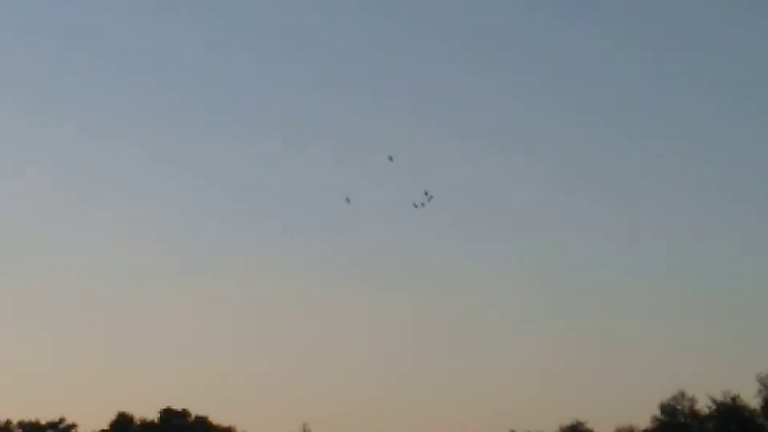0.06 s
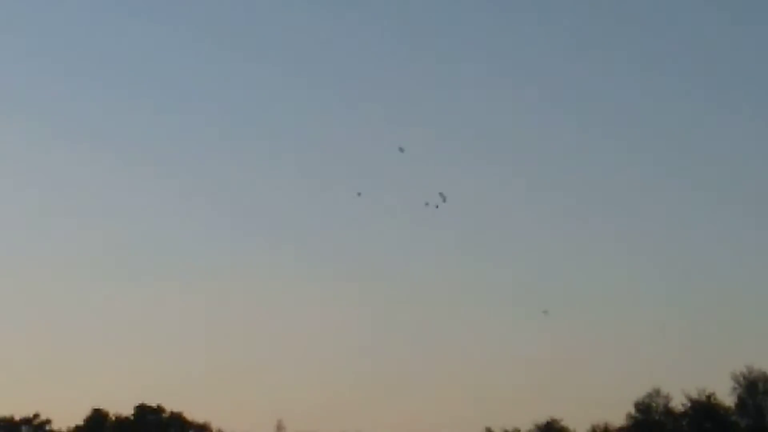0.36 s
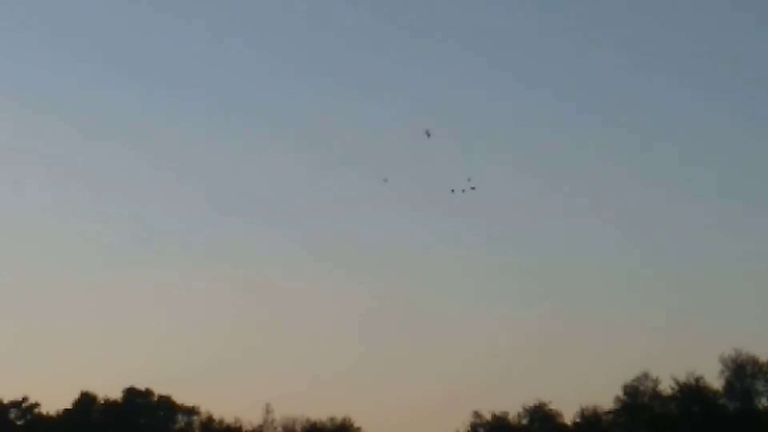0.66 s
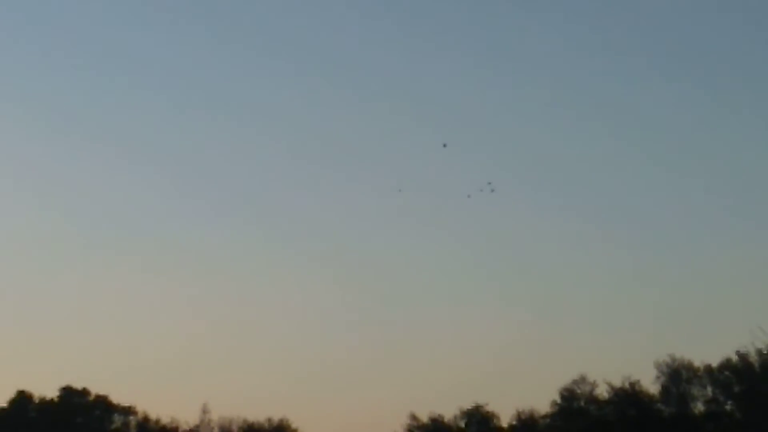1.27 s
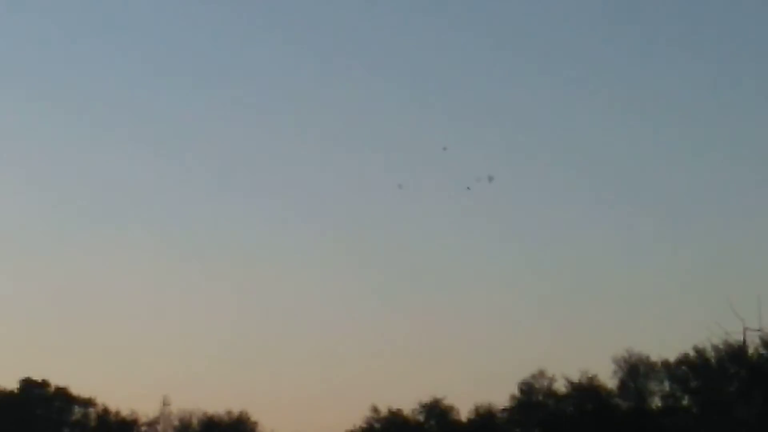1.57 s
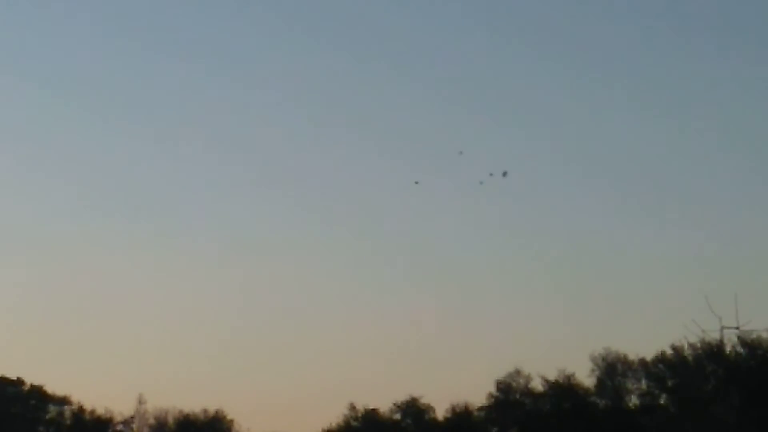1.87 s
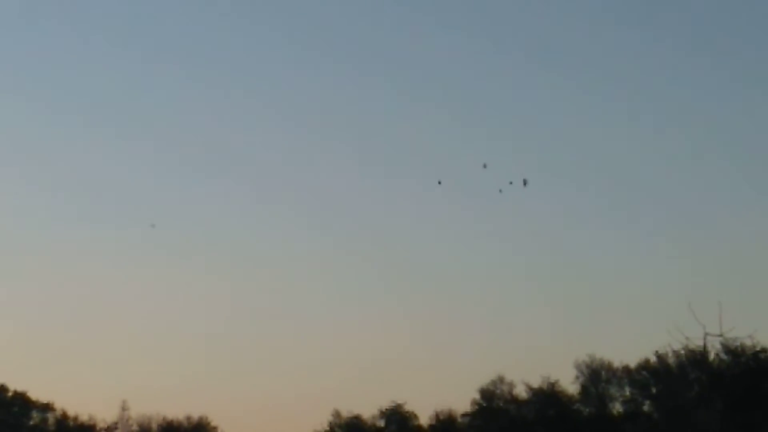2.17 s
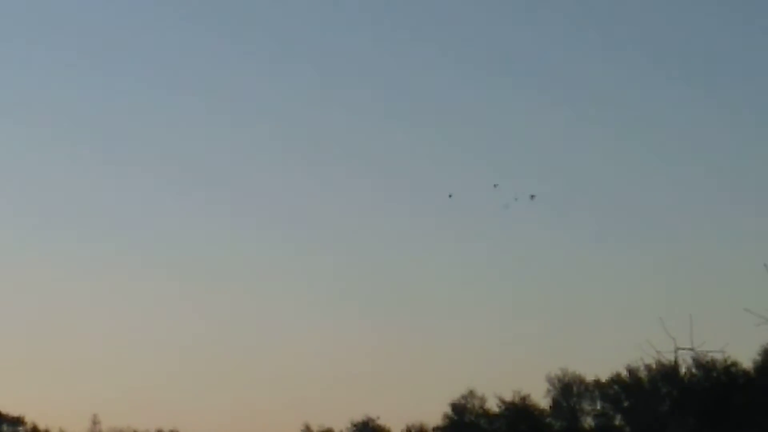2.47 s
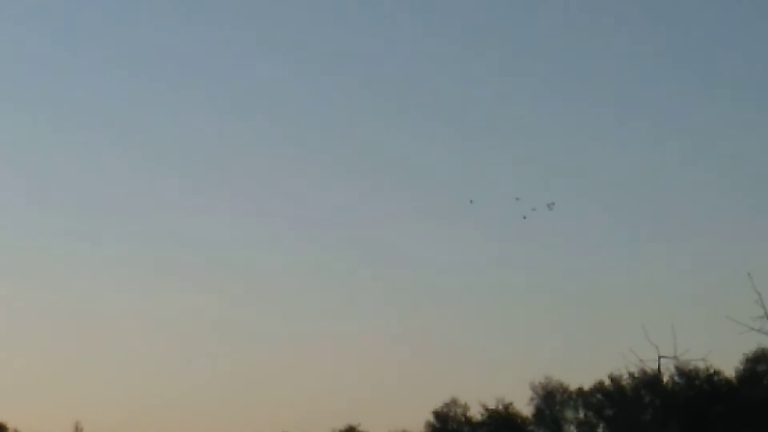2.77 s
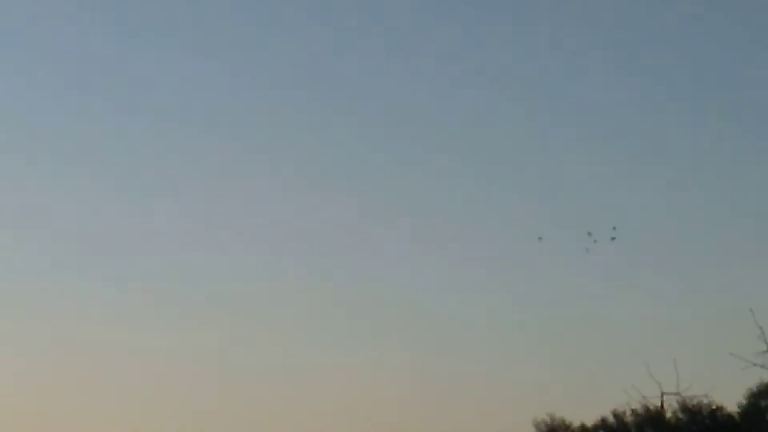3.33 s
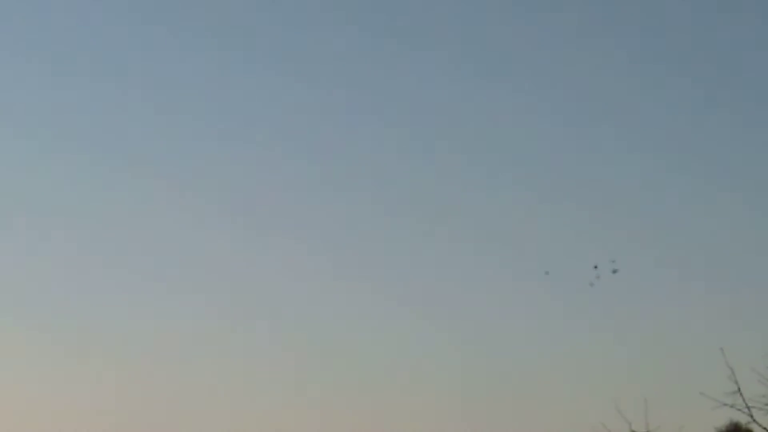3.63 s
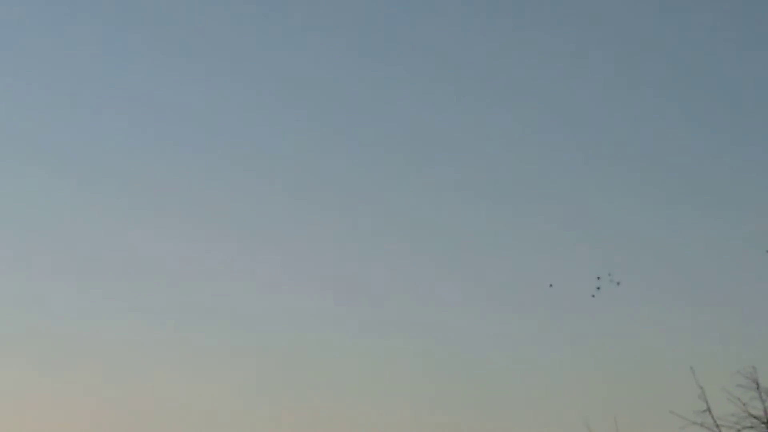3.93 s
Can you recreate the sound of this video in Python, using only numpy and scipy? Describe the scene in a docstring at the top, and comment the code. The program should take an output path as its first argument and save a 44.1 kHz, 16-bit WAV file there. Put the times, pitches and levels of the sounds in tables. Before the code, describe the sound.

Long falling bird calls repeat outdoors, mixed with short chirps and faint microphone bumps.

```python
"""Birds at dusk over a tree line.

A bird of prey gives five long falling mews, each breaking to a lower note at its end. A second bird
cuts in with short arched chirps; others add thin slurs, a rasp and far caws. The pitched calls are
gliding stacks of partials that the trees scatter back. Handling bumps ring the camera's case on the
right of the microphone, over faint rumble and still air."""
import sys
import numpy as np
from scipy import signal
from scipy.fft import rfft, irfft
from scipy.io import wavfile

SR = 44100
rng = np.random.default_rng(int(sys.argv[2]) if len(sys.argv) > 2 else 0)


def generate_wav(sig):
    """Save sig (samples, or channels by samples) to the path in sys.argv[1] as 16-bit PCM at SR."""
    pcm = np.round(np.clip(np.atleast_2d(sig).T, -1, 1) * 32767).astype(np.int16)
    wavfile.write(sys.argv[1], SR, pcm)


N = 176400
TIME = np.arange(N) / SR
TREE_LINE_T60_S = 0.56


def from_db(db):
    """Decibels to gain."""
    return 10 ** (np.asarray(db) / 20)


def along(rows, x, column=1):
    """Read a breakpoint curve by straight lines."""
    rows = np.array(rows)
    return np.interp(x, rows[:, 0], rows[:, column])


def at_hz(points, hz):
    """Read an EQ curve in dB on a log-frequency axis."""
    f, db = np.transpose(points)
    return np.interp(np.log(np.maximum(hz, 1)), np.log(f), db)


def sides(pan_db):
    """Equal-power pan gains; pan_db is left minus right."""
    ratio = from_db(np.atleast_1d(pan_db))
    return np.array([ratio, np.ones_like(ratio)]) * np.sqrt(2 / (1 + ratio ** 2))


def coloured(x, points):
    """Shape a sound with an EQ curve."""
    hz = np.fft.rfftfreq(x.shape[-1], 1 / SR)
    return irfft(rfft(x) * from_db(at_hz(points, hz)), x.shape[-1])


def noise(points):
    """Coloured noise of unit power, unrelated in the two channels."""
    x = coloured(rng.standard_normal((2, N)), points)
    return x / np.sqrt(np.mean(x ** 2))


def wander(t, rate):
    """Random drift with a spread near 1 and `rate` turning points a second."""
    return np.interp(t * rate, np.arange(4096), rng.standard_normal(4096))


def gate(t, length, attack_s, release_s):
    """Envelope: rounded rise, hold, straight fall."""
    return np.sin(np.pi / 2 * np.clip(t / attack_s, 0, 1)) * np.clip((length - t) / release_s, 0, 1)


def swells(rows):
    """Envelope of bell-shaped rises and falls."""
    return sum(from_db(db) * np.exp(-((TIME - s) / width) ** 2) for s, width, db in rows)


def phase_of(hz, t, jitter, rate=500):
    """Running phase of a slightly unsteady voice; jitter is a share of the pitch."""
    return 2 * np.pi * np.cumsum(hz * (1 + jitter * wander(t, rate))) / SR


def partials(phase, levels_db):
    """Harmonic stack of one voice."""
    return sum(from_db(db) * np.sin(k * phase) for k, db in enumerate(levels_db, 1))


def add(out, start, x):
    """Mix a sound in at its start time."""
    i = int(start * SR)
    out[i:i + len(x)] += x[:max(N - i, 0)]


def scatter(x, t60_s, build_s=0.0091):
    """Diffuse dying echoes, different on each side."""
    # darkened tone of the echoes: (frequency [Hz], level [dB])
    echo_eq = [(1000, 1), (3200, -1.5), (5000, -4.5), (6700, -7), (8200, -7), (10000, -7.5), (14000, -13.5)]
    t = TIME[:SR]
    wash = coloured(rng.standard_normal((2, SR)), echo_eq)
    envelope = from_db(-60 * t / t60_s) * (1 - np.exp(-t / build_s))
    tail = wash * envelope / np.sqrt(np.sum(envelope ** 2))
    return signal.fftconvolve(x[None], tail, axes=1)[:, :N]


def placed(x, pan, left_lag_ms):
    """A bird at the two microphone ports: panned by frequency, slightly later on the left."""
    hz = np.fft.rfftfreq(N, 1 / SR)
    lag = np.exp(-2j * np.pi * hz * left_lag_ms / 1000 * np.array([[1], [0]]))
    return irfft(rfft(x) * sides(at_hz(pan, hz)) * lag, N)


def background():
    """Still evening air, and a low rumble mostly out of phase between the channels."""
    # tone of the air and of the rumble: (frequency [Hz], level [dB])
    air_eq = [(100, -2), (300, -6.5), (900, 0.5), (1700, -3.5), (2600, 11), (4000, -10.5), (8000, -16),
              (12500, -12), (15500, -21.5)]
    rumble_eq = [(20, -13.5), (55, 10.5), (100, 9), (180, 1), (350, -11.5), (1000, -34)]
    opposed, common = noise(rumble_eq)
    rumble = opposed * np.array([[1], [-1]]) + from_db(-11.5) * common
    return from_db(-72) * noise(air_eq) + from_db(-67) * rumble


def hisses():
    """Soft swells of very high hiss on the left."""
    # swells of hiss: (time [s], width [s], level [dB])
    cues = [(.04, 0.024, -56.5), (.503, 0.011, -63), (.555, 0.017, -67), (2.395, 0.0069, -66),
            (2.76, 0.041, -71), (2.96, 0.035, -65.5), (3.02, 0.045, -72.5)]
    # airy top band: (frequency [Hz], level [dB])
    hiss_eq = [(6000, -46), (10500, 29.5), (13000, 29), (15500, -50)]
    return noise(hiss_eq) * swells(cues) * sides(pan_db=25)


def thumps():
    """Dull stirrings of the hand on the camera."""
    # shifts of the grip: (time [s], width [s], level [dB])
    cues = [(.235, 0.013, -67.5), (1.09, 0.022, -57.5), (1.87, .035, -62), (3.6, 0.075, -67),
            (3.79, 0.022, -61.5), (3.97, 0.021, -59.5)]
    # bass-heavy tone: (frequency [Hz], level [dB])
    thump_eq = [(40, -8), (80, -3), (165, 1), (230, -14.5), (500, -36), (2000, -97)]
    return noise(thump_eq) * swells(cues)


def rustles():
    """Faint rubbing of the hand on the case, mostly on the right."""
    # slides of the hand: (time [s], width [s], level [dB])
    cues = [(.03, 0.017, -50.5), (2.97, .04, -65), (3.25, 0.034, -59), (3.34, 0.051, -58.5),
            (3.47, 0.051, -67), (3.62, 0.056, -63.5), (3.79, 0.079, -71), (3.99, 0.032, -59)]
    # tone of the rubbing: (frequency [Hz], level [dB])
    rustle_eq = [(120, -20.5), (270, 8.5), (600, -8.5), (1000, -2), (1600, 2.5), (2500, -12), (5000, -28),
                 (10000, -45)]
    return noise(rustle_eq) * swells(cues) * sides(pan_db=-6.5)


def bumps():
    """Short knocks ring the damped modes of the camera's case, on the right, each with a faint tail."""
    # knocks: (time [s], strike level [dB], contact low-pass [Hz], extra drive of the lowest mode [dB])
    hits = [(.0160, -2.5, 833, 6.5), (0.018, -22, 910, -2), (0.0255, -30, 1490, -4),
            (0.0325, -26, 694, 13.5), (.0929, -10.5, 3240, -2), (0.8806, -10.5, 3350, -6),
            (1.61, -17.5, 3570, 4), (1.708, -12, 3250, -20), (1.8033, -18.5, 2380, 4),
            (2.3482, -13.5, 3670, -12.5), (2.8292, -13.5, 3570, 4), (2.9359, -13, 3330, 0),
            (2.949, -26.5, 5730, 14.5), (3.2142, -16.5, 3730, 11), (3.2258, -31.5, 2100, 24),
            (3.29, -16, 2220, 11.5), (3.5623, -15, 3440, 7.5)]
    # resonances of the case, lowest first: (frequency [Hz], bandwidth [Hz], gain [dB])
    case_modes = [(282, 199, -26), (550, 190, -22.5), (764, 119, -27.5), (1574, 830, -9.5),
                  (2414, 570, -19), (5040, 4000, 3.5)]
    knocks, thuds, case = np.zeros((3, N))
    for start, db, contact_hz, thud_db in hits:
        softness = signal.butter(2, contact_hz, fs=SR)
        contact = from_db(db) * signal.lfilter(*softness, signal.unit_impulse(512))
        add(knocks, start, contact)
        add(thuds, start, contact * from_db(thud_db))
    for k, (hz, width_hz, db) in enumerate(case_modes):
        radius, angle = np.exp(-np.pi * width_hz / SR), 2 * np.pi * hz / SR
        poles = [1, -2 * radius * np.cos(angle), radius ** 2]
        drive = (knocks if k else thuds) + 1e-18 * rng.standard_normal(N)  # guards against underflow
        case += from_db(db) * signal.lfilter([.5, 0, -.5], poles, drive)
    case = signal.sosfilt(signal.butter(2, [236, 4950], "band", fs=SR, output="sos"), case)
    # EQ on the send to the tail: (frequency [Hz], level [dB])
    tail_eq = [(150, -4), (300, 1), (700, -5), (1000, 3.5), (2000, -1), (4000, 0), (8000, 3)]
    tail = from_db(-7.5) * scatter(coloured(case, tail_eq), t60_s=0.36)
    return case * sides(pan_db=-29) + tail * sides(pan_db=-17)


def caws():
    """Far low calls, hoarse with pitch jitter, sagging a little and echoing off the trees."""
    # caws: (start [s], length [s], pitch [Hz], level [dB])
    calls = [(2.644, 0.098, 472.6, -62), (3.639, 0.1004, 479, -51.5), (3.953, 0.12, 451.3, -57)]
    # harmonics from a weak fundamental up: (level [dB])
    harmonics_db = [-33, -7.5, -4, -6.5, -24]
    out = np.zeros(N)
    for start, length, hz, db in calls:
        t = TIME[:int(length * SR)]
        sag = 1 - 0.0638 * t / length
        voice = partials(phase_of(hz * sag, t, jitter=0.077, rate=590), harmonics_db)
        add(out, start, from_db(db) * voice * gate(t, length, 0.025, 0.035))
    return out + from_db(-3.5) * scatter(out, TREE_LINE_T60_S)


def rasp():
    """One harsh, toneless note: a burst of bright noise."""
    # sharp attack and stepped decay: (time [s], level [dB])
    envelope = [(3.742, -73), (3.749, -41), (3.762, -42.5), (3.773, -52.5), (3.82, -56), (3.84, -65.5),
                (3.9, -78)]
    # tone of the rasp: (frequency [Hz], level [dB])
    rasp_eq = [(2500, -29), (3700, -5), (5300, 4.5), (6200, -7), (7300, -22.5), (11000, -19), (13500, -25),
               (15000, -51)]
    sounding = (TIME > envelope[0][0]) & (TIME < envelope[-1][0])
    return noise(rasp_eq) * from_db(along(envelope, TIME)) * sounding


def slurs():
    """Quick thin downward whistles of a smaller bird."""
    # slurs: (start [s], length [s], first pitch [Hz], last pitch [Hz], level [dB])
    calls = [(0.441, 0.045, 4600, 4130, -63), (0.482, 0.055, 4380, 3363, -43.5),
             (.528, 0.027, 3390, 1985, -51), (3.516, 0.058, 4150, 3800, -60),
             (3.89, 0.047, 4550, 3760, -65)]
    # harmonics from a strong fundamental up: (level [dB])
    harmonics_db = [3.5, -17.5, -24]
    out = np.zeros(N)
    for start, length, first_hz, last_hz, db in calls:
        t = TIME[:int(length * SR)]
        phase = phase_of(first_hz + (last_hz - first_hz) * t / length, t, jitter=0.014)
        add(out, start, from_db(db) * partials(phase, harmonics_db) * gate(t, length, 0.014, 0.012))
    return out


def chirps():
    """Each chirp leaps an octave, sags and drops back; its harmonics sweep the throat's resonances."""
    # chirps: (start [s], top pitch [Hz], level [dB], high shelf [dB], warble depth [share of pitch])
    calls = [(0.71, 3550, -38.5, -11, 0.0036), (1.002, 3558, -36, 1, 0.0041), (1.207, 3500, -37, 6, 0.044),
             (1.416, 3530, -41.5, 4.5, 0.038), (1.606, 3528, -39, 1.5, 0.015),
             (1.777, 3484, -36, -6.5, 0.024), (1.981, 3435, -36.5, -3.5, 0.0054),
             (2.237, 3426, -39.5, -2.5, 0.0042)]
    # arch of one chirp: (time [s], pitch [share of top pitch], level [dB])
    arch = [(0, .52, -25), (.012, .68, -6), (.018, .98, -5), (.022, 1.0, -3), (.042, .935, 0),
            (.058, .865, -1), (.063, .6, -8), (.080, .5, -18)]
    # resonances of the throat: (frequency [Hz], level [dB])
    throat = [(1700, 3), (2300, -6.5), (3200, -8), (4800, 3.5), (5600, -14.5), (6800, -3.5), (7600, -17.5),
              (8300, -29.5), (10000, -11), (11500, -13), (13000, -26), (14500, -43)]
    warble_hz, shelf_hz = 256.3, 10200
    length = arch[-1][0]
    t = TIME[:int(length * SR)]
    envelope = from_db(along(arch, t, column=2)) * gate(t, length, 0.0026, 0.0016)
    out = np.zeros(N)
    for start, top_hz, db, shelf_db, warble_depth in calls:
        hz = top_hz * along(arch, t)
        warble = 1 + warble_depth * np.sin(2 * np.pi * warble_hz * t)
        phase = phase_of(hz * warble, t, jitter=0.011, rate=900)
        harmonics_db = [at_hz(throat, k * hz) + shelf_db * (k * hz > shelf_hz) for k in range(1, 5)]
        add(out, start, from_db(db) * partials(phase, harmonics_db) * envelope)
    return out


def small_birds():
    """Chirps and slurs, smeared by close foliage and echoed by the trees; the rasp stays dry."""
    # the treble leans left: (frequency [Hz], left minus right [dB])
    pan = [(1800, -6.5), (3300, -1), (5000, 3), (6700, -1.5), (8000, 9), (10000, 19), (13500, 25)]
    calls = chirps() + slurs()
    leaves = from_db(-0.5) * scatter(calls, t60_s=0.088, build_s=0.006)
    trees = from_db(-3.5) * scatter(calls, t60_s=0.54)
    return placed(from_db(-2.5) * calls + leaves + trees + rasp(), pan, left_lag_ms=0.028)


def mew_voice(t, length, first_hz, last_hz, overtones_db, highest_db):
    """A hoarse-edged whistle that scoops up, overshoots, sinks and dips just before the voice breaks."""
    # partials, the half multiples coming from uneven cycles: (frequency [multiple of pitch])
    multiples = [.5, 1, 1.5, 2, 2.5, 3, 3.5, 4]
    # balance of those partials: (level [dB])
    levels_db = [-26.5, -0.5, -18, -14.5, -23.5, -24, -36.5, -32.5]
    # quarter multiples that roughen the onset: (frequency [multiple of pitch])
    onset_multiples = [.75, 1.25, 1.75, 2.25, 2.75]
    progress = t / length
    glide_hz = first_hz + (last_hz - first_hz) * progress
    scoop_hz = 641.6 * np.exp(-t / 0.01)
    overshoot_hz = 348.8 * np.exp(-t / 0.037)
    dip_hz = 170 * np.exp((t - length) / 0.0085)
    waver = 1 + 0.0028 * wander(t, rate=36.17)
    phase = phase_of((glide_hz + overshoot_hz - scoop_hz) * waver - dip_hz, t, jitter=0.0026)
    voice = 0
    for k, db in zip(multiples, levels_db):
        # each overtone fades in and out while the whole call slowly dulls
        brightness_db = overtones_db + 3 * (1 - progress) + 4.5 * wander(t, rate=11.55)
        flutter_db = 1.8 * (.5 + progress) * wander(t, rate=93)
        partial_db = db + (k > 1) * brightness_db + (k >= 3) * highest_db + flutter_db
        voice += from_db(partial_db) * np.sin(k * phase)
    hoarseness = sum(np.sin(k * phase) / k ** 2 for k in onset_multiples)
    return voice + from_db(-12.5) * np.exp(-(t / 0.04) ** 2) * hoarseness


def closing_note(hz):
    """The lower, reedier note that a mew breaks to, drooping as it fades."""
    # pitch droop: (time [s], pitch [share of first pitch])
    droop = [(0, 1.0), (.06, .97), (.105, .93), (.145, .8)]
    # harmonics from the fundamental up, strongest at the second and third: (level [dB])
    harmonics_db = [-28.5, -0.5, 0, -15, -26, -28]
    length_s, fade_db = 0.15, -4.5
    t = TIME[:int(length_s * SR)]
    voice = partials(phase_of(hz * along(droop, t), t, jitter=0.005), harmonics_db)
    return voice * from_db(fade_db * t / length_s) * gate(t, length_s, 0.003, 0.06)


def bird_of_prey():
    """Five long mews, each with its closing note, scattered back by the trees."""
    # mews: (start [s], length [s], glide start [Hz], glide end [Hz], attack [s], first level [dB],
    # middle level [dB], last level [dB], overtone trim [dB], extra trim of the highest overtones [dB],
    # closing pitch [Hz], closing level [dB])
    calls = [(0.016, .402, 2872, 2487, 0.094, -40.5, -46, -47, -1, 1.5, 985, -51.5),
             (0.787, .420, 2874, 2475, 0.067, -33.5, -36.5, -46, 2, 0.5, 981, -48.5),
             (1.602, 0.47, 2960, 2358, 0.12, -38.5, -44, -47.5, -4, 6, 900, -68),
             (2.415, .385, 2723, 2415, 0.058, -35, -45.5, -46, 1.5, -3, 939, -64.5),
             (3.242, 0.41, 2728, 2422, 0.074, -36, -42, -43.5, -6, -4.5, 920.5, -52)]
    # the treble leans left: (frequency [Hz], left minus right [dB])
    pan = [(1400, -5.5), (2700, 0.5), (4000, 5), (5300, 5), (6700, 9), (8000, 25), (11000, 27)]
    out = np.zeros(N)
    for (start, length, first_hz, last_hz, attack_s, *contour_db,
         overtones_db, highest_db, closing_hz, closing_db) in calls:
        t = TIME[:int(length * SR)]
        voice = mew_voice(t, length, first_hz, last_hz, overtones_db, highest_db)
        contour = from_db(np.interp(t / length, [0, .5, 1], contour_db))
        add(out, start, voice * contour * gate(t, length, attack_s, release_s=0.0019))
        add(out, start + length, from_db(closing_db) * closing_note(closing_hz))
    trees = from_db(-6) * scatter(out, TREE_LINE_T60_S)
    return placed(out + trees, pan, left_lag_ms=0.065)


def scene():
    """The birds and their echoes, with handling noise and air around them."""
    birds = bird_of_prey() + small_birds() + caws()
    return birds + hisses() + bumps() + thumps() + rustles() + background()


def record(dry):
    """A steep low-pass takes off the very top."""
    cutoff_hz = 15800
    return signal.sosfilt(signal.ellip(10, .1, 70, cutoff_hz, fs=SR, output="sos"), dry)


dry = scene()
out = record(dry)
generate_wav(out)
```